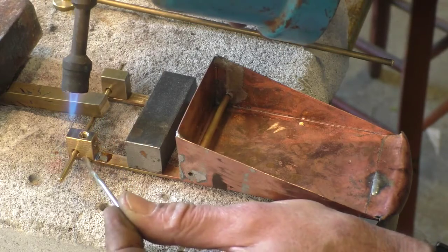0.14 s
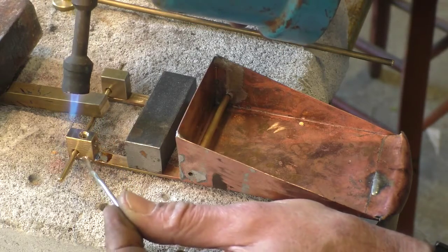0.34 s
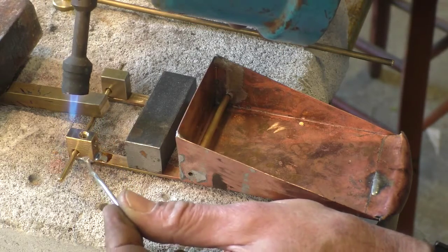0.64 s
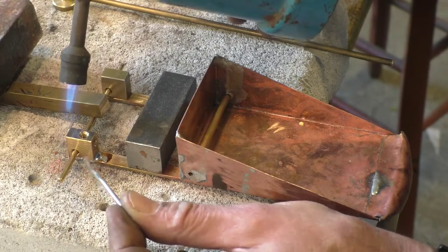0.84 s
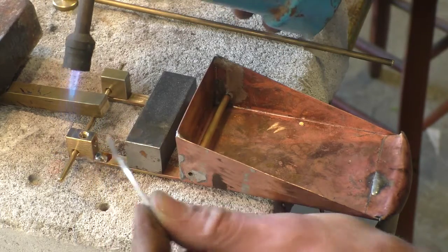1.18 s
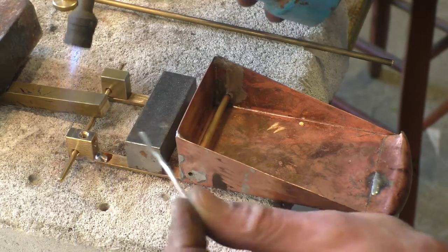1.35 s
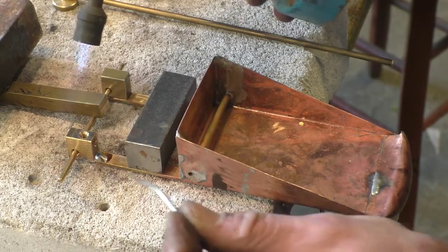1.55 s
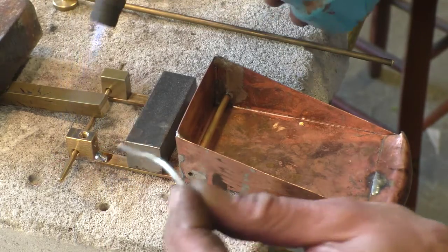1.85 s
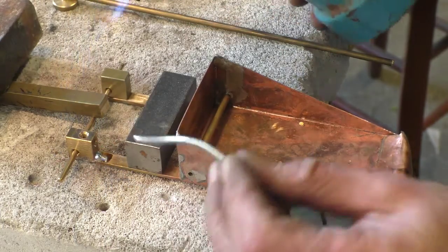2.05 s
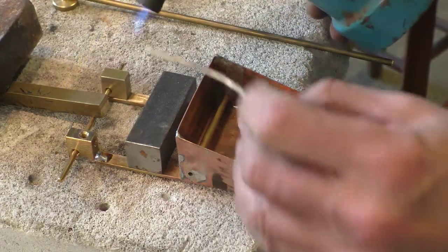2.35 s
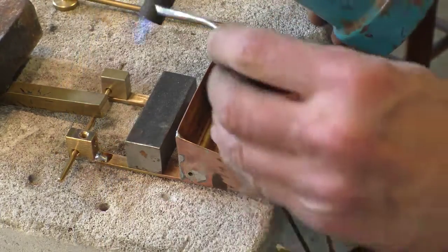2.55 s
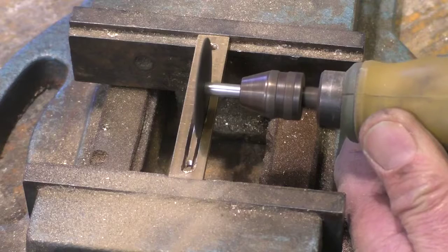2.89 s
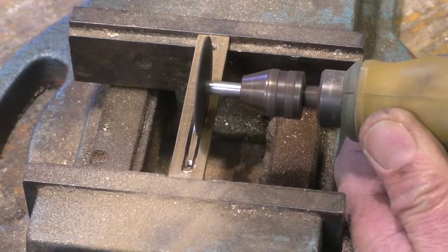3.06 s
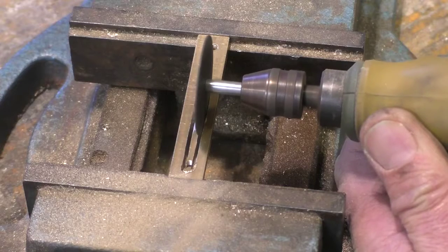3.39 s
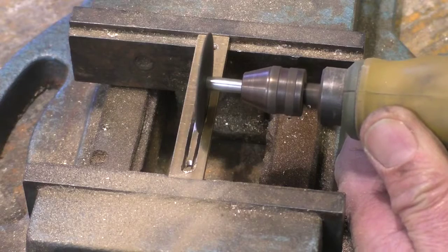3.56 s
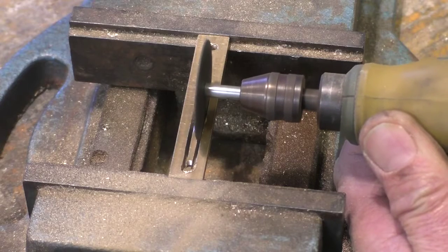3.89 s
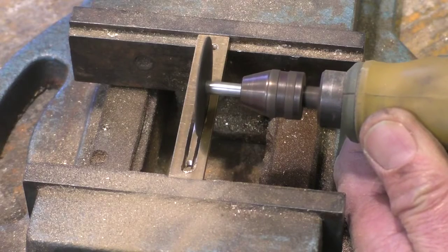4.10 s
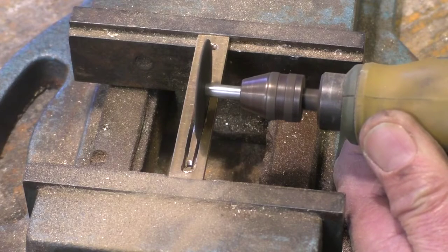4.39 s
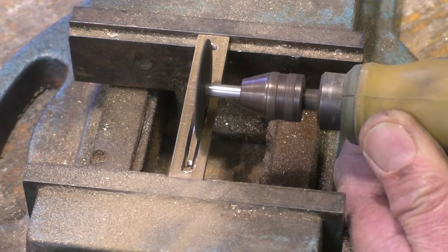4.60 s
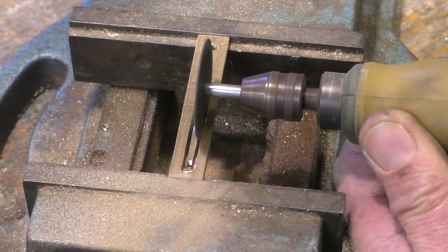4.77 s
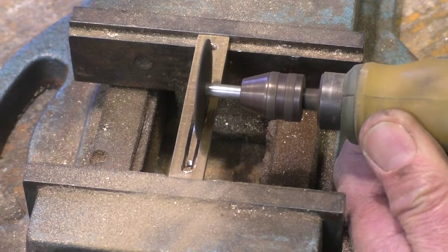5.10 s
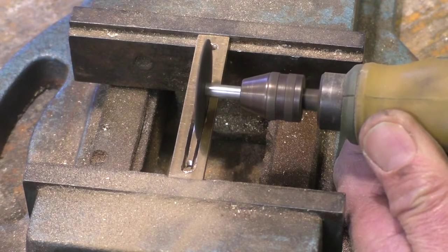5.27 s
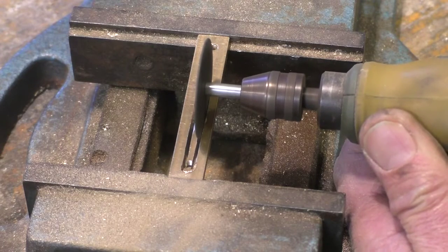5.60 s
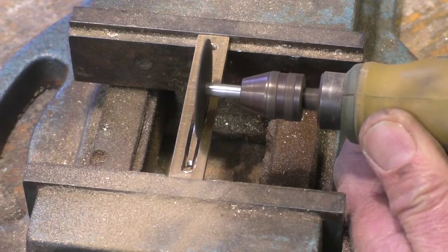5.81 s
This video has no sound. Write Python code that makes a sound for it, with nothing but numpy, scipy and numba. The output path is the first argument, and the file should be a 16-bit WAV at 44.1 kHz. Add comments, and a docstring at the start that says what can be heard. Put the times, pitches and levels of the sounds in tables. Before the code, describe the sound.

A gas torch roars and hisses over small brass parts, then a hard cut to a small power drill whining and chattering in clamped brass.

```python
"""Workshop bench, close to a stereo microphone. A gas torch roars and hisses over brass parts and is lifted away;
a hard cut leads to a small mains drill whose bit chatters in a clamped brass strip, then runs free and hisses.
Torch: band-shaped noise shaken by shared puffs, three moving hiss resonances, late returns, mains hum.
Drill: sine lines on shaft orders and field sidebands, noise partly repeating each turn, a low rumble under it."""
import sys
import numpy as np
from scipy import signal
from scipy.fft import rfft, irfft, next_fast_len
from scipy.io import wavfile
from scipy.ndimage import uniform_filter1d, map_coordinates
from numba import njit

SR = 44100
rng = np.random.default_rng(int(sys.argv[2]) if len(sys.argv) > 2 else 0)


def generate_wav(signal):
    """Clip the signal to [-1, 1] and save it as 16-bit WAV at the path in sys.argv[1]."""
    frames = np.transpose(np.atleast_2d(signal))
    scaled = np.clip(frames, -1, 1) * 32767
    pcm = np.round(scaled).astype(np.int16)
    wavfile.write(sys.argv[1], SR, pcm)


N = 261954

# Source levels are before late returns, stereo and recorder. Spectra are relative: noise is scaled to rms 1.
# torch over time: start_s, lift_0_to_1, whistle_level_db, lower_band_hz, upper_band_level_db
TORCH = [(0, 0, -54, 8160, -66), (.5, 0, -55, 8500, -58.5), (.75, 0, -57, 8250, -60),
         (1.1, 0.25, -67, 8200, -57.5), (1.55, 0.4, -74, 8560, -74), (1.68, 0.64, -59, 8500, -51),
         (1.89, .8, -48.5, 8100, -58.5), (2.1, 0.94, -53.5, 8460, -53), (2.47, 0.54, -44, 8600, -53)]
# flame roar spectrum: freq_hz, relative_db_per_hz
ROAR_SPECTRUM = [(15, -52), (25, -23), (49, -17.5), (124, -14.5), (369, 0), (729, -2), (924, -6.5),
                 (1020, -12), (1100, -20), (1430, -41), (2420, -120)]
# flame licking the metal, spectrum: freq_hz, relative_db_per_hz
LICK_SPECTRUM = [(590, -18), (1000, -12), (1120, 1.5), (1870, -6.5), (2420, -5), (2860, -6.5),
                 (3550, -13.5), (3750, -28), (5200, -42), (8800, -120)]
# gas jet spectrum: freq_hz, relative_db_per_hz
JET_SPECTRUM = [(2120, -33), (3750, -2.5), (4100, -1.5), (7280, -12.5), (8330, -8), (9530, -12.5),
                (11000, -12), (12700, -19), (14700, -19), (15600, -23)]
# first-stage resonance widths: whistle_hz, lower_band_hz, upper_band_hz
JET_WIDTHS_HZ = [280, 1300, 690]
# returns from bench, tank and hand, by how the nozzle is held: start_s, bench_lag_ms, tank_lag_ms, hand_lag_ms
RETURN_LAGS = [(0, .87, .54, 1.1), (.5, .84, .54, 1.09), (1.0, .875, .6, 1.08), (1.45, .89, .62, 1.2),
               (1.85, .93, .54, 1.5), (2.15, .87, .58, 1.46), (2.47, .82, .58, 1.3)]
# mains hum under the torch: freq_hz, peak_level_db
MAINS_HUM = [(50, -66), (100, -61)]
# drill shaft speed: start_s, shaft_turns_hz
SHAFT = [(2.48, 166.6), (2.63, 170.7), (2.66, 174.2), (2.7, 175.3), (2.79, 167.8), (3.04, 167),
         (3.11, 163.3), (3.2, 162.7), (3.29, 165), (3.37, 161.4), (3.54, 166.3), (4.01, 170.4),
         (4.06, 168.4), (4.49, 165.6), (4.55, 163.1), (4.63, 166.3), (4.75, 164.9), (4.8, 160.5),
         (4.91, 163.6), (5.03, 160.2), (5.16, 163.2), (5.3, 159), (5.63, 163.9), (5.78, 160.5),
         (5.83, 165.7), (5.86, 162.6)]
# strong shaft lines: order, light_cut_level_db, heavy_cut_level_db
STRONG_ORDERS = [(6, -49.5, -51), (7, -45, -38.5), (8, -41, -43.5), (9, -36.5, -35), (10, -49, -48.5)]
# weak shaft lines: order, light_cut_level_db, heavy_cut_level_db
WEAK_ORDERS = [(1, -60, -56), (2, -61.5, -63), (3, -60.5, -64), (4, -53.5, -52), (5, -57, -64),
               (11, -53, -62), (12, -52, -46.5), (13, -64, -54), (14, -63, -67)]
# lines split off the orders by the field: order, side_sign, light_cut_level_db, heavy_cut_level_db
FIELD_LINES = [(4, -1, -64, -64), (5, 1, -64, -65), (6, -1, -64, -64), (6, 1, -57, -58), (7, -1, -57, -64),
               (7, 1, -52, -50), (8, -1, -53, -48), (8, 1, -51, -41), (9, -1, -48, -47), (9, 1, -51, -48),
               (10, -1, -46, -42), (11, -1, -58, -57), (11, 1, -58, -57), (12, -1, -60, -53)]
# spells in which one order sings out: start_s, length_s, order, boost_db
SPELLS = [(2.471, .065, 7, 17), (2.48, 0.056, 10, 17), (2.53, 0.28, 6, 8.5), (2.62, 0.18, 3, 5.5),
          (2.654, 0.074, 9, 5), (2.793, 0.32, 8, 5.5), (2.794, 0.35, 9, 4), (2.794, 0.43, 10, 11),
          (3.08, 0.33, 6, 4.5), (3.087, 0.2, 7, 12.5), (3.09, 0.39, 1, 2), (3.08, 0.44, 9, 2),
          (3.271, 0.076, 10, 13), (3.341, 0.12, 7, 9.5), (3.377, 0.35, 10, 13.5), (3.757, 0.15, 10, 8.5),
          (3.462, 0.85, 8, 3.5), (3.504, 1.28, 9, 4.5), (3.65, 1.096, 7, 3.5), (3.78, 0.41, 2, 4),
          (4.06, 0.091, 10, 7.5), (4.26, 0.52, 10, 12), (4.3, 0.45, 6, 5), (4.76, 0.9, 9, 5.5),
          (5.64, .13, 9, 2.5), (4.789, 0.398, 10, 11.5), (5.263, .21, 10, 8.5), (5.788, 0.035, 7, 9.5),
          (5.769, .04, 9, 3.5), (5.824, 0.043, 9, 9)]
# cutting noise over time: start_s, bit_and_fan_hiss_level_db, thin_ring_hz
CUTTING = [(2.48, -27.5, 12500), (2.6, -28, 12550), (2.82, -27, 12400), (2.95, -28.5, 12500),
           (3.1, -27, 12000), (3.5, -28, 12060), (4.08, -28.5, 12150), (4.2, -27, 12400),
           (4.83, -26.5, 12400), (5.1, -27.5, 12200), (5.78, -27, 12470), (5.84, -24.5, 12420),
           (5.94, -25, 12470)]
# rattle spectrum: freq_hz, relative_db_per_hz
RATTLE_SPECTRUM = [(30, -45), (100, -50), (250, -24), (500, -17), (900, -13.5), (1150, -3.5), (1450, 2),
                   (1700, -3.5), (2000, -10.5), (2600, -21)]
# broad hiss spectrum: freq_hz, relative_db_per_hz
HISS_SPECTRUM = [(1000, -50), (1700, -9), (1770, -20.5), (2240, -6), (2940, -3), (3370, -8.5), (3930, 0.5),
                 (4680, -10), (5540, 2.5), (6300, -6), (8170, -4), (9510, -8), (10500, -38), (13600, -36),
                 (22000, -120)]
# resonances in the hiss: freq_hz, width_hz, relative_db
HISS_MODES = [(2920, 140, -8), (3200, 140, -10), (3730, 40, -6), (4040, 110, -6), (5710, 120, -4),
              (6740, 210, -7), (7320, 150, -3), (8070, 440, 0), (8860, 120, -5), (9520, 93, -10),
              (10200, 220, -11), (10700, 250, -13)]
# top hiss spectrum: freq_hz, relative_db_per_hz
TOP_SPECTRUM = [(5760, -19), (9800, -5), (10600, -4), (11500, -3), (12200, -2.5), (12600, 5), (13500, -6.5),
                (15600, -8)]
# per-turn repeating noise against fresh noise: freq_hz, gain_db
REPEAT_GAIN = [(1800, -4), (4000, -3), (8000, -2), (12000, -6)]
# low shop rumble under the drill: freq_hz, relative_db_per_hz
RUMBLE_SPECTRUM = [(13, -45), (22, -15), (43, -12), (70, -16), (102, -6), (125, -24), (140, -3), (180, -33),
                   (310, -120)]
# side against mid: freq_hz, side_db
TORCH_SIDE = [(60, -4), (110, -12), (200, -13), (380, -19.5), (700, -14), (1290, -13), (2380, -12.5),
              (4400, -11), (8120, -36), (15000, -1)]
DRILL_SIDE = [(60, -10), (110, -28), (200, -15), (380, -14), (700, -13), (1290, -13.5), (2380, -9),
              (4400, -8.5), (8120, -25.5), (15000, -9)]
# left against right: freq_hz, left_minus_right_db
TORCH_BALANCE = [(60, -0.5), (110, -0.5), (200, -0.5), (380, -0.5), (700, 0.5), (1290, 1.0), (2380, 2.0),
                 (4400, 0.5), (8120, 0.0), (15000, 1.0)]
DRILL_BALANCE = [(60, 0.0), (110, 0.0), (200, -0.5), (380, -1.0), (700, -2.5), (1290, -1.0), (2380, -1.5),
                 (4400, -1.5), (8120, 0.0), (15000, 0.0)]

CUT_S, CUT_FADE_S = 2.475, 0.0047
TORCH_END, DRILL_START = next_fast_len(int(2.6 * SR)), N - next_fast_len(int(3.6 * SR))  # samples
ROOM_DECAY_S, RECORDER_TOP_HZ = 0.046, 15740
RUMBLE_PORT_DB = -70 + 10 * np.log10(2)
# dB with flame on the brass, dB lifted away
ROAR_DB, LICK_DB = (-35.5, -36.5), (-38.5, -43.5)
JET_DB, LOWER_BAND_DB = (-51.5, -46), (-62.5, -51.5)
WHISTLE_HZ, UPPER_BAND_HZ = 3416, 11100
RETURN_GAINS = (.3, .18, .13)  # bench, tank, hand
FIELD_HZ = 100  # the field pulls twice a mains cycle
SPELL_FADE_S = 0.031
HEAVY_S = (4.33, 4.92)  # cut grows from light to heavy
FREE_S, FREE_DB = (5.81, 5.845), -15  # bit leaves the metal, lines drop
SETTLE_S = (3.3, 4.5)  # top hiss, thin ring and bit ring move between levels
# dB before settling, dB after, dB added per unit of lost biting gain
TOP_DB, THIN_DB, BIT_RING_DB = (-39, -37.5, 12), (-42, -53.5, 10), (-31, -41.5, 16.5)
THIN_WIDTH_HZ, BIT_RING_HZ, BIT_RING_WIDTH_HZ = 510, 8390, 640  # first-stage widths
RATTLE_REFERENCE_DB = -38  # scaled further by biting


def undb(db):
    """dB to gain."""
    return np.exp(np.asarray(db) * np.log(10) / 20)


def unit(x):
    """Scaled to rms 1."""
    return x / np.sqrt(np.mean(x ** 2))


def between(ends, share):
    """From the first value to the second as share goes 0 to 1."""
    return ends[0] + share * (ends[1] - ends[0])


def columns(table, t):
    """Every value column of a time table, interpolated at t."""
    start_s, *values = np.transpose(table)
    return [np.interp(t, start_s, value) for value in values]


def bins_hz(size):
    """Frequency of each FFT bin."""
    return np.arange(size // 2 + 1) * SR / size


def shape(points, size):
    """Gain at each bin, interpolated over log frequency."""
    hz, db = np.transpose(points)
    return undb(np.interp(np.log(bins_hz(size) + 1), np.log(hz), db))


def closed(points):
    """Spectrum with a 40 dB fall outside its first and last point."""
    (low_hz, low_db), (high_hz, high_db) = points[0], points[-1]
    return [(low_hz * .85, low_db - 40)] + list(points) + [(high_hz * 1.15, high_db - 40)]


def walk(rate_hz, size):
    """Random levels joined smoothly at rate_hz; spread near 1."""
    step = int(SR / rate_hz)
    count = size // step + 2
    knots = np.interp(np.arange(size) / step, np.arange(count), rng.standard_normal(count))
    return 1.3 * uniform_filter1d(knots, step)


def flicker(x, gain, depth_db, rate_hz):
    """Noise coloured by gain, in half-octave bands whose levels waver independently; rms 1."""
    size = len(x)
    spectrum, octave = rfft(x) * gain, np.log2(bins_hz(size) + 1)
    out = 0
    for centre in np.arange(4.5, 14.5, .5):
        band = np.clip(1 - 2 * abs(octave - centre), 0, 1)
        if (band * gain).max() > 1e-3 * gain.max():
            out = out + undb(depth_db * walk(rate_hz, size)) * irfft(band * spectrum, size)
    return unit(out)


@njit
def svf(x, hz, width_hz):
    """State-variable band-pass with a moving centre, gain 1 there."""
    y, band, low = np.empty(len(x)), 0., 0.
    for i in range(len(x)):
        g, damping = np.tan(np.pi * hz[i] / SR), width_hz / hz[i]
        v = (band + g * (x[i] - low)) / (1 + g * (g + damping))
        band, low, y[i] = 2 * v - band, low + 2 * g * v, damping * v
    return y


def ring(air, hz, width_hz):
    """Steep moving resonance blown by noise: two band-passes, the second twice as wide; rms 1."""
    first = svf(air, hz, 1. * width_hz)
    return unit(svf(first, hz, 2. * width_hz))


def stereo(mid, side, balance):
    """Side signal is the mid smeared by a decaying room echo; each band leans left or right."""
    size, tail_s = len(mid), np.arange(8192) / SR
    echo = rng.standard_normal(len(tail_s)) * np.exp(-tail_s / ROOM_DECAY_S)
    smear = rfft(echo / np.sqrt(np.sum(echo ** 2)), size) * shape(side, size)
    lean = np.sqrt(shape(balance, size))
    spectrum = rfft(mid)
    left = irfft(spectrum * (lean + smear), size)
    right = irfft(spectrum * (1 / lean - smear), size)
    return np.array([left, right])


def rumble(size):
    """Low shaped noise, unrelated at the two microphone ports."""
    gain = shape(closed(RUMBLE_SPECTRUM), size)
    ports = [unit(irfft(rfft(air) * gain, size)) for air in rng.standard_normal((2, size))]
    return undb(RUMBLE_PORT_DB) * np.array(ports)


def mains_hum(t):
    """Steady sines at the mains frequency and its double."""
    return sum(undb(db) * np.sin(2 * np.pi * hz * t) for hz, db in MAINS_HUM)


def late_returns(t, bright):
    """Bench, tank and hand return the bright torch sound after short, moving lags."""
    lags_ms = columns(RETURN_LAGS, t)
    return sum(gain * np.interp(t - ms / 1000, t, bright) for ms, gain in zip(lags_ms, RETURN_GAINS))


def torch(t):
    """Turbulent puffs of flame roar, lick the metal and shake the jet, whose hiss has three bands."""
    lift, whistle_db, lower_hz, upper_db = columns(TORCH, t)
    size = len(t)
    puffs = walk(90, size)
    noise = rng.standard_normal((6, size))
    roar_air = noise[0] * undb(0.26 * puffs)
    lick_air = noise[1] * undb(0.78 * puffs)
    jet_air = noise[2] * undb(0.71 * puffs + 0.41 * walk(400, size))
    roar = flicker(roar_air, shape(closed(ROAR_SPECTRUM), size), depth_db=-1.27, rate_hz=12.33)
    lick = flicker(lick_air, shape(closed(LICK_SPECTRUM), size), depth_db=1.0, rate_hz=8.47)
    jet = flicker(jet_air, shape(closed(JET_SPECTRUM), size), depth_db=1.0, rate_hz=5.7)
    bright = undb(between(LICK_DB, lift)) * lick + undb(between(JET_DB, lift)) * jet
    centres_hz = WHISTLE_HZ, lower_hz, UPPER_BAND_HZ
    levels_db = whistle_db, between(LOWER_BAND_DB, lift), upper_db
    for hz, db, width_hz, air in zip(centres_hz, levels_db, JET_WIDTHS_HZ, noise[3:]):
        moving_hz = hz * (1 + .008 * walk(3.9, size))
        bright = bright + undb(db + 1.7 * walk(7.9, size)) * ring(air, moving_hz, width_hz)
    return undb(between(ROAR_DB, lift)) * roar + bright + late_returns(t, bright) + mains_hum(t)


def singing(t, order):
    """dB that the spells add to one order."""
    boost_db = 0
    for start_s, length_s, spell_order, db in SPELLS:
        if spell_order == order:
            edge_s = np.minimum(t - start_s, start_s + length_s - t)
            boost_db = boost_db + db * np.clip(edge_s / SPELL_FADE_S + .5, 0, 1)
    return boost_db


def motor(t, turns):
    """Lines on multiples of the shaft rate, and lines that the field splits off them."""
    heavy, size = np.interp(t, HEAVY_S, [0, 1]), len(t)
    lines = []  # phase in cycles, rms level in dB
    for orders, waver_db, rate_hz in ((STRONG_ORDERS, 1.5, 12), (WEAK_ORDERS, 1.3, 6.3)):
        for order, light_db, heavy_db in orders:
            db = between((light_db, heavy_db), heavy) + singing(t, order)
            lines.append((order * turns, db + waver_db * walk(rate_hz, size)))
    for order, side, light_db, heavy_db in FIELD_LINES:
        db = between((light_db, heavy_db), heavy) + 0.85 * walk(6.0, size)
        slip = .11 * walk(14, size)  # load jolts shift field against shaft, cycles
        lines.append((order * turns + side * FIELD_HZ * t + slip, db))
    out = 0
    for cycles, db in lines:
        # lines stay nearly in step, so they add up to one knock a turn
        phase = 2 * np.pi * (cycles + .15 * rng.standard_normal())
        out = out + np.sqrt(2) * undb(db) * np.cos(phase)
    return out


def burr_noise(t, turns):
    """Noise read by shaft angle: the bit meets nearly the same burrs each turn."""
    steps, renew_hz = 192, 30.
    burrs = rng.standard_normal((400, steps))
    where = [t * renew_hz, turns % 1 * steps]
    repeat = unit(map_coordinates(burrs, where, order=1, mode="grid-wrap"))
    return irfft(rfft(repeat) * shape(REPEAT_GAIN, len(t)), len(t))


def hiss_body(size):
    """Hiss gain: broad spectrum plus resonant modes, summed as power."""
    hz = bins_hz(size)
    modes = sum(undb(2 * db) / (1 + (2 * (hz - mode_hz) / width_hz) ** 2) ** 1.3
                for mode_hz, width_hz, db in HISS_MODES)
    return np.sqrt(undb(-12.0) * shape(closed(HISS_SPECTRUM), size) ** 2 + modes)


def cutting(t, turns, biting):
    """Rattle, hiss and rings from bit noise that swells once a turn and with the field."""
    size = len(t)
    hiss_db, thin_hz = columns(CUTTING, t)
    top_db, thin_db, bit_db = (np.interp(t, SETTLE_S, db[:2]) + db[2] * (1 - biting)
                               for db in (TOP_DB, THIN_DB, BIT_RING_DB))
    turn_swell = biting * 0.13 * np.cos(2 * np.pi * turns)
    swell = 1 + turn_swell + .05 * np.cos(2 * np.pi * FIELD_HZ * t)
    scrape = swell * (biting * burr_noise(t, turns) + rng.standard_normal(size))
    rattle_air, bit_air = swell * rng.standard_normal((2, size))
    rattle = flicker(rattle_air, shape(closed(RATTLE_SPECTRUM), size), depth_db=2.1, rate_hz=14)
    hiss = flicker(scrape, hiss_body(size), depth_db=1.2, rate_hz=14)
    top = flicker(scrape, shape(closed(TOP_SPECTRUM), size), depth_db=1.5, rate_hz=10.22)
    thin = ring(scrape, thin_hz, THIN_WIDTH_HZ)
    bit = ring(bit_air, np.full(size, 1. * BIT_RING_HZ), BIT_RING_WIDTH_HZ)
    out = undb(RATTLE_REFERENCE_DB) * (0.6 + 0.57 * biting) * rattle
    out += undb(hiss_db) * hiss + undb(top_db) * top + undb(thin_db) * thin
    return out + undb(bit_db + 1.4 * walk(5.3, size)) * bit


def drill(t):
    """Motor lines and cutting noise on one shaft angle; the lines drop when the bit runs free."""
    shaft_hz, = columns(SHAFT, t)
    turns = np.cumsum(shaft_hz) / SR
    biting = undb(np.interp(t, FREE_S, [0, FREE_DB]))
    return biting * motor(t, turns) + cutting(t, turns, biting)


def scene():
    """Torch, then a hard cut to the drill over its rumble."""
    t = np.arange(N) / SR
    after = np.clip((t - CUT_S) / CUT_FADE_S + .5, 0, 1)
    burning = stereo(torch(t[:TORCH_END]), TORCH_SIDE, TORCH_BALANCE)
    drilling = stereo(drill(t[DRILL_START:]), DRILL_SIDE, DRILL_BALANCE) + rumble(N - DRILL_START)
    out = np.zeros((2, N))
    out[:, :TORCH_END] += (1 - after[:TORCH_END]) * burning
    out[:, DRILL_START:] += after[DRILL_START:] * drilling
    return out


def record(dry):
    """The recorder cuts the top steeply: one elliptic low-pass applied twice."""
    cut = signal.ellip(14, .2, 65, RECORDER_TOP_HZ, fs=SR, output="sos")
    return signal.sosfilt(cut, signal.sosfilt(cut, dry))


dry = scene()
out = record(dry)
generate_wav(out)
```